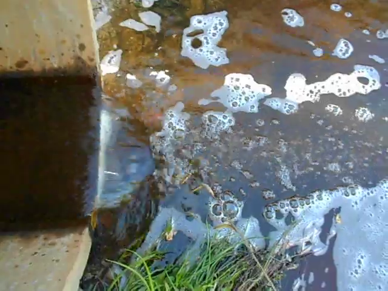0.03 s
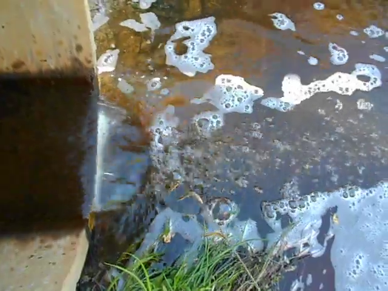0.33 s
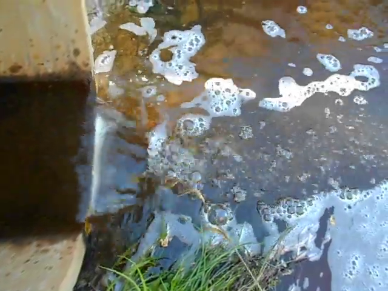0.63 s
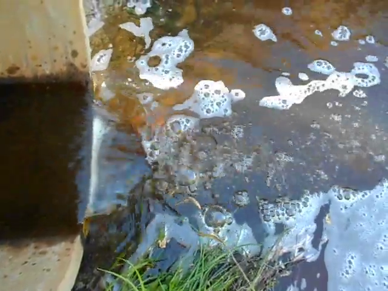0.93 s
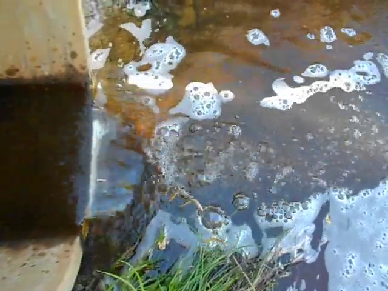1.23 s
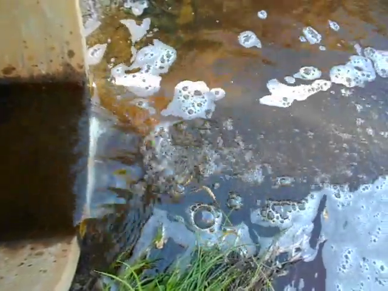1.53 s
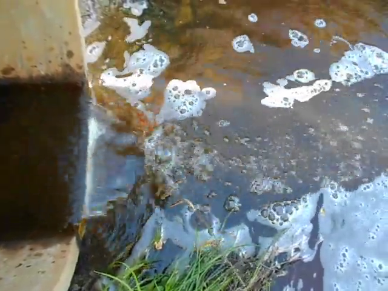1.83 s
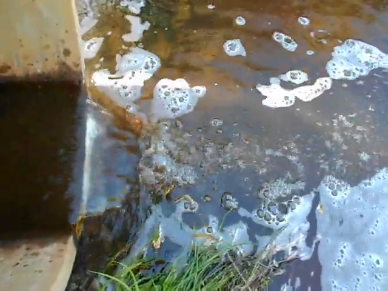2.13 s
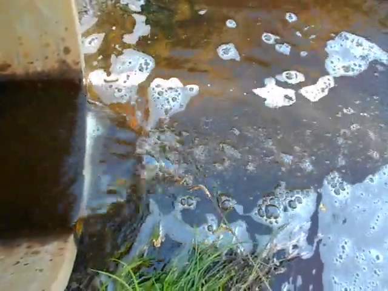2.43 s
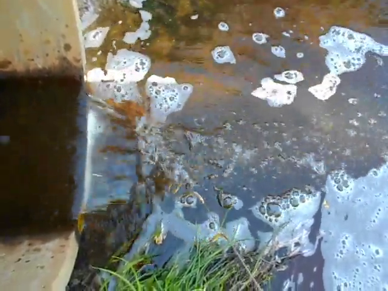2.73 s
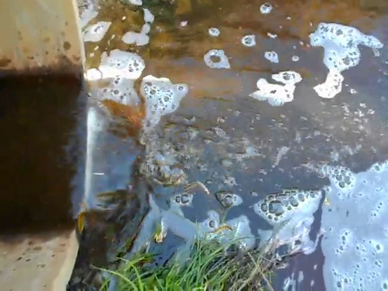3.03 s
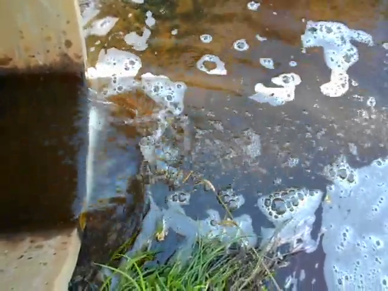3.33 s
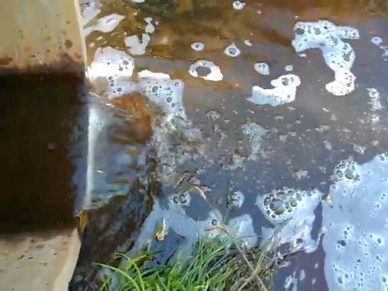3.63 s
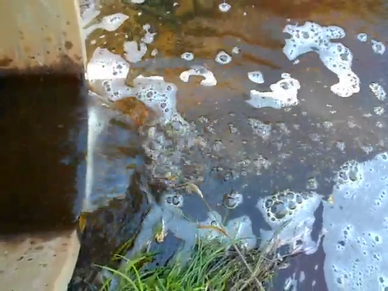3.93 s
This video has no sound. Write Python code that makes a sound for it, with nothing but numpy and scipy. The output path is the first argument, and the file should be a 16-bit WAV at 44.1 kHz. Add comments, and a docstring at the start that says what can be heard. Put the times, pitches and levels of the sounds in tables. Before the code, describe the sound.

Water babbles and splashes from a concrete culvert into a pool, close and outdoors, for four seconds. It dips just after the start, recovers by 0.5 seconds, then swells and ebbs with bubbles, rising gurgles, ticking droplets and fizzing foam over a faint hollow resonance. Wind buffets the microphone, mostly in the first two seconds. A few soft glugs come between 3 and 4 seconds.

```python
"""Close, babbling splashes outdoors: a sheet of water slides out of a concrete culvert into a pool.
Trapped air rings as bubbles and mostly rising gurgles, while spray ticks on the surface over fizzing foam.
The headwall adds a short echo; the culvert hums along and gives a few soft glugs near the end.
Wind buffets the microphone, mostly in the first two seconds."""
import sys
import numpy as np
from scipy import signal
from scipy.fft import rfft, irfft
from scipy.io import wavfile

SR = 44100
rng = np.random.default_rng(int(sys.argv[2]) if len(sys.argv) > 2 else 0)


def wrap_up_sound(samples):
    """Save the sound to the file named by the first command line argument, as 16-bit audio."""
    columns = np.atleast_2d(samples).T
    # keep every value between -1 and 1, then stretch to whole-number steps
    tamed = np.clip(columns, -1, 1)
    steps = np.round(tamed * 32767).astype(np.int16)
    wavfile.write(sys.argv[1], SR, steps)


N = 176400

# The recorder's gain ducks just after the start and recovers; then the splashing swells and ebbs
# (time [s], babble fader [dB], spray fader [dB])
FLOW = [(0.08, -47, -52), (0.095, -61, -64.5), (0.3, -45.5, -48.5), (0.45, -35.5, -43), (0.58, -38, -40),
        (0.79, -40, -43), (0.86, -38, -43), (1.15, -35.5, -39.5), (1.38, -31.5, -34.5), (1.5, -31.5, -35),
        (1.72, -35.5, -40), (1.9, -31.5, -36), (1.97, -35, -36.5), (2.15, -31, -37.5), (2.37, -32, -35.5),
        (2.43, -36.5, -43.5), (2.54, -41.5, -43.5), (2.63, -37, -38.5), (2.8, -30, -37.5),
        (2.94, -36.5, -38), (3.12, -33, -38.5), (3.24, -35, -40), (3.38, -32, -32.5), (3.48, -38.5, -38.5),
        (3.62, -32, -37), (3.71, -35.0, -37.5), (3.89, -28.5, -36.5), (3.97, -37.5, -41)]
# Hollow resonances of the culvert, lowest first (pitch [Hz], bandwidth [Hz], relative level [dB])
CULVERT_MODES = [(306.3,20.6,4.5),(560,116,3),(941,48,5)]
BUBBLE_ONSET, DROP_ONSET = 0.22, 0.23  # attack, as a share of the ring time
SURGE_HZ = 35.3  # quick unevenness of the falling sheet
SPLAT_HZ = 9130  # bright click of a drop's impact


def undb(db):
    """Decibels to gain."""
    return 10 ** (np.asarray(db) / 20)


def unit(x):
    """Scale to rms 1."""
    return x / np.sqrt(np.mean(x ** 2))


def fader(table, column=1):
    """Gain at every sample from one dB column of a timed table."""
    rows = np.array(table)
    return undb(np.interp(np.arange(N) / SR, rows[:, 0], rows[:, column]))


def colour(points, hz):
    """Gain at the given frequencies of an EQ curve (frequency [Hz], gain [dB])."""
    corners, db = np.array(points).T
    return undb(np.interp(np.log(np.maximum(hz, 1)), np.log(corners), db))


def equalise(x, points):
    """Shape a sound with an EQ curve."""
    return irfft(rfft(x) * colour(points, np.fft.rfftfreq(N, 1 / SR)), N)


def noise(points):
    """Noise coloured by an EQ curve, at rms 1."""
    return unit(equalise(rng.standard_normal(N), points))


def wobble(rate_hz):
    """Smooth random motion at rms 1, mostly slower than the given rate."""
    hz = np.fft.rfftfreq(N, 1 / SR)
    return unit(irfft(rfft(rng.standard_normal(N)) / (1 + (hz / rate_hz) ** 2), N))


def swells(times, half_lengths, db):
    """Bell-shaped swells of level."""
    t = np.arange(N)[:, None] / SR
    return (undb(db) * np.exp(-((t - times) / half_lengths) ** 2)).sum(axis=1)


def rings(times, pitches, peaks, decays, rise, onset):
    """Pings that swell quickly and die away; rise is the share of the pitch gained per ring time."""
    out = np.zeros(N)
    glides = rise * np.ones(len(times))
    for t0, hz, peak, ring_s, glide in zip(times, pitches, peaks, decays, glides):
        start = int(np.clip(t0 * SR, 0, N - 1))
        age = np.arange(int(6 * ring_s * SR) + 2) / (SR * ring_s)  # in ring times
        envelope = np.exp(-age) * (1 - np.exp(-(age / onset) ** 2))
        phase = 2 * np.pi * hz * ring_s * (age + glide * age ** 2 / 2)
        tone = peak * envelope / envelope.max() * np.sin(phase)
        out[start:start + len(tone)] += tone[:N - start]
    return out


def swarm(points, cycles, rise, spread_db, onset, count):
    """Small bubbles at random moments, most weak, a few strong; cycles and rise are typical values."""
    when, register, chance, ring_length, glide = rng.random((count, 5)).T
    low_hz, high_hz = points[0][0], points[-1][0]
    hz = low_hz * (high_hz / low_hz) ** register
    rarity = -np.log(chance + .025)
    peaks = undb(spread_db * rarity) * colour(points, hz)
    decays = cycles / hz * 2 ** (2 * (ring_length - .5))
    return unit(rings(when * N / SR, hz, peaks, decays, 2 * rise * glide, onset))


def wind():
    """Gusts rumble on the microphone; the sharpest puffs flutter higher."""
    # Rise and fall of the gusts (time [s], relative level [dB])
    gusts = [(0,-22),(.05,-34.5),(.1,-46),(.18,-39),(.31,-35.5),(.42,-35),(.5,-50),(.68,-46),(.7,-26),(.75,-39),(.88,-31),(.95,-45),(1.07,-38.5),(1.34,-55),(1.39,-32.5),(1.45,-46),(1.53,-33),(1.83,-44.5),(1.92,-52.5),(2.33,-48.5),(2.5,-59),(4,-51.5)]
    # Sharp puffs (time [s], half length [s], level [dB])
    puffs = [(0.305,0.082,-39.5),(0.7,0.012,-30.5),(0.885,0.029,-30)]
    # Tone of the rumble and of the puffs (frequency [Hz], gain [dB])
    rumble_eq = [(15,2),(50,3),(90,-6),(150,-16.5),(250,-20.5),(400,-28),(1000,-32),(4000,-82)]
    puff_eq = [(60, -16), (130, -7.5), (260, -10), (600, -35.5), (2000, -46)]
    rumble = undb(4) * fader(gusts) * noise(rumble_eq)
    return rumble + swells(*np.array(puffs).T) * noise(puff_eq)


def wall_echo(water, decay_s=0.012):
    """The headwall scatters the splashing back as a short, diffuse echo."""
    t = np.arange(SR // 5) / SR
    echo = rng.standard_normal(len(t)) * np.exp(-t / decay_s) * (t > .002)
    return undb(-13.5) * signal.fftconvolve(water, echo / np.linalg.norm(echo))[:N]


def culvert_hum(water):
    """The splashing rings the culvert's hollow resonances."""
    return undb(-3) * sum(undb(db) * signal.lfilter(*signal.iirpeak(hz, hz / width, fs=SR), water)
                          for hz, width, db in CULVERT_MODES)


def glugs(half_length_s=0.014):
    """A swell of water makes the culvert's mouth boom briefly at its lowest resonance."""
    # Swells of water (time [s], level [dB])
    booms = [(2.999,-39.5),(3.582,-38),(3.775,-35),(3.889,-39)]
    times, db = np.array(booms).T
    hz, width, _ = CULVERT_MODES[0]
    wavering_hz = hz + width * wobble(SURGE_HZ)
    tone = np.sqrt(2) * np.sin(2 * np.pi * np.cumsum(wavering_hz) / SR)
    return swells(times, half_length_s, db) * tone


def ticks(low_hz=5300, ring_s=0.0004, spread_octaves=0.075):
    """Droplets smack the surface without ringing on: a low and a high click, detuned on each hit."""
    # Droplet hits (time [s], peak of each click [dB])
    hits = [(0.1709,-28.5),(.726,-19),(0.9172,-20),(.9672,-14.5),(1.002,-15),(1.1464,-20.5),(1.2526,-13.5),(1.463,-21),(1.5097,-16),(1.576,-14.5),(1.8454,-28),
            (1.9164,-11.5),(2.054,-13),(2.3932,-9),(2.447,-19),(2.924,-16.5),(3.157,-14),(3.262,-15.5),(3.3251,-9),(3.429,-14),(3.519,-15.5),(3.6885,-14)]
    times, db = np.array(hits).T
    detune = 2 ** (spread_octaves * rng.standard_normal(len(times)))
    return sum(rings(times, hz * detune, undb(db), ring_s / detune, rise=0, onset=DROP_ONSET)
               for hz in (low_hz, SPLAT_HZ))


def drops(splat_s=0.00045, splat_db=-8.5):
    """Each big drop slaps the surface with a click and traps a tiny ringing bubble."""
    # Drops and their bubbles (time [s], pitch [Hz], relative peak [dB], ring time [ms])
    hits = [(0.6386,5830,-3,0.37),(0.8812,5340,-8,0.65),(1.3323,4860,-15,2.2),(1.3978,8950,-10.5,0.72),(1.507,7060,-19,0.88),(1.64,7040,-17,0.76),(1.744,5560,-20.5,1.6),(1.8945,5980,-9,0.43),
            (2.299,9800,-16,0.42),(2.339,6630,-12,0.86),(2.3468,4870,-5.5,0.31),(2.3787,4900,-14,2.1),
            (2.3889,5130,-8,0.8),(2.7785,4700,-15.5,0.53),(2.8433,10100,-13.5,0.43),(2.8570,5980,-9,1),(3.0085,5500,-13.5,0.84),
            (3.0396,4290,-12.5,1.7),(3.3033,4600,-20,1.3),(3.321,4800,-12.5,1.3),(3.3535,4800,-17,1.5),(3.4000,7650,-9,0.87),
            (3.4815,5450,-12.5,0.52),(3.7943,6000,-10.5,0.4),(3.9364,5520,-17,1.1)]
    times, hz, db, ring_ms = np.array(hits).T
    each = np.ones(len(times))
    splats = rings(times, SPLAT_HZ * each, undb(db + splat_db), splat_s * each, rise=0, onset=DROP_ONSET)
    plinks = rings(times, hz, undb(db), ring_ms / 1000, rise=-0.019, onset=DROP_ONSET)
    return undb(0.85) * (splats + plinks)


def large_bubbles():
    """Large single bubbles ring out of the babble, each at a steady pitch."""
    # Bubble notes (time [s], pitch [Hz], peak [dB], ring time [ms])
    notes = [(.441,1180,-24.5,7.3),(.444,1470,-23,3.8),(1.238,1640,-22,1.9),(1.253,573,-30.5,8.8),(1.352,1895,-20.5,5.1),(1.384,960,-23.5,5.9),(1.409,1020,-22.5,4),
             (1.463,2770,-19.5,2.5),(1.483,720,-24,9.3),(1.490,1297,-24,6),(1.557,976,-12,4.4),(1.686,1920,-23,2.9),(1.880,1696,-17.5,6),(1.899,868,-24.5,6.9),(1.925,2310,-14.5,1.6),(1.994,2500,-17,0.94),(2.013,620,-23,1.7),(2.228,558,-36.5,20),(2.331,803,-24,5.8),(2.354,2740,-16.5,2.7),(2.361,1730,-22.5,4.6),(2.393,1250,-20,2.4),
             (2.711,1014,-21.5,5.8),(3.266,1560,-26,7.2),(3.303,810,-22.5,3),(3.388,547,-32,13.5),(3.391,1400,-18.5,2.9),(3.402,2800,-21,3.2),(3.622,2200,-17.5,1.7),(3.645,1920,-18,3.1),(3.654,976,-23,5)]
    times, hz, db, ring_ms = np.array(notes).T
    return rings(times, hz, undb(db), ring_ms / 1000, rise=0, onset=BUBBLE_ONSET)


def gurgles(roughness=0.67):
    """An air pocket closes: its ring glides, mostly upwards, shaken by the water around it."""
    # Air pockets (time [s], length [s], start pitch [Hz], end pitch [Hz], level [dB])
    pockets = [(0.412,0.0313,847,1343,-41.5),(0.704,0.032,775,1440,-38.5),(1.056,0.027,516,1080,-36.5),(1.789,0.058,676,1150,-40),
               (3.102,0.042,1125,938,-35.5),(3.132,.042,396,688,-35),(3.096,0.076,3620,3720,-43.5),(3.196,0.1,4080,4200,-45),(3.581,0.0194,960,1620,-35.5),(3.75,0.031,947,1450,-31),(3.779,0.024,1680,1470,-31.5),(3.868,0.034,620,1060,-31.5)]
    out, t = np.zeros(N), np.arange(N) / SR
    # Complex, so it shakes both level and phase
    shake = (1 + roughness * (wobble(150) + 1j * wobble(140))) / np.sqrt(1 + 2 * roughness ** 2)
    for t0, length, start_hz, end_hz, db in pockets:
        sounding = (t > t0) & (t < t0 + length)
        progress = (t[sounding] - t0) / length
        phase = 2 * np.pi * np.cumsum(start_hz * (end_hz / start_hz) ** progress) / SR
        envelope = 2 * undb(db) * np.sqrt(np.sin(np.pi * progress))
        out[sounding] += envelope * np.imag(shake[sounding] * np.exp(1j * phase))
    return out


def spray():
    """Fine droplets patter on the surface over a fizz of foam."""
    # Tone of the droplets and of the foam (frequency [Hz], gain [dB])
    patter_eq = [(3000,-9),(4000,-6),(4900,3),(6000,-0.5),(9000,-2.5),(10500,7)]
    fizz_eq = [(1000,3),(2500,-1),(3500,0),(4900,7),(6500,0),(8000,2),(10000,1.5),(12000,-17)]
    patter = swarm(patter_eq, cycles=5.3, rise=-0.043, spread_db=5.5, onset=DROP_ONSET, count=2800)
    fizz = noise(fizz_eq) * undb(1.8 * wobble(98))
    return fader(FLOW, column=2) * (undb(0.57) * patter + undb(-4) * fizz)


def babble():
    """The plunging sheet folds air into the pool: bubbles and small rising chirps over a churning wash."""
    # Tone of the bubbles, the chirps and the wash (frequency [Hz], gain [dB])
    bubble_eq = [(250,-9),(600,-5),(950,7),(2000,14.5),(2800,10.5),(4000,-25)]
    chirp_eq = [(550,-3.5),(850,6),(1500,-6)]
    churn_eq = [(150,-30),(290,-32),(380,-8),(560,-2.5),(950,4),(1300,-1),(2200,0.5),(3200,-8.5),(5000,-13),(12000,-29)]
    bubbles = swarm(bubble_eq, cycles=5.6, rise=0.0623, spread_db=3, onset=BUBBLE_ONSET, count=3400)
    chirps = swarm(chirp_eq, cycles=6, rise=0.12, spread_db=1.5, onset=0.9, count=150)
    churn = noise(churn_eq) * undb(2 * wobble(SURGE_HZ))
    return fader(FLOW) * (undb(-5) * bubbles + undb(-13) * chirps + undb(-6) * churn)


def scene():
    """Mono mix of the surging water, the concrete around it and the wind."""
    stream = (babble() + spray()) * undb(2 * wobble(SURGE_HZ))
    water = stream + gurgles() + ticks() + large_bubbles() + drops()
    return (water + wall_echo(water) + culvert_hum(water) + glugs() + wind())[None]


def record(dry):
    """The sound snaps in after 35 ms of silence, its top treble shelved down and then cut off."""
    fade_in = np.clip((np.arange(N) / SR - .035) / .002, 0, 1)
    # Treble shelf (frequency [Hz], gain [dB])
    shelf_eq = [(10300, 0), (11000, -6), (11800, -4.5), (12500, -19)]
    high_cut = signal.ellip(8, .2, 70, 12400, fs=SR, output="sos")
    return signal.sosfilt(high_cut, equalise(dry * fade_in, shelf_eq))


dry = scene()
out = record(dry)
wrap_up_sound(out)
```